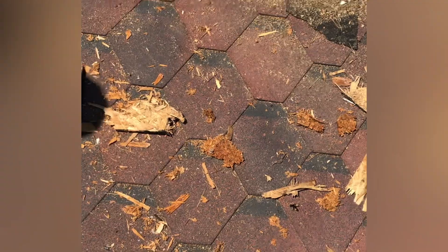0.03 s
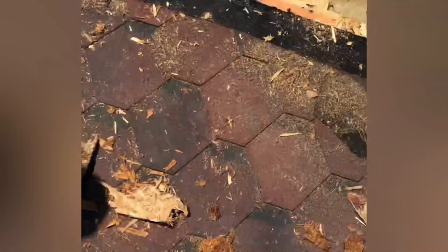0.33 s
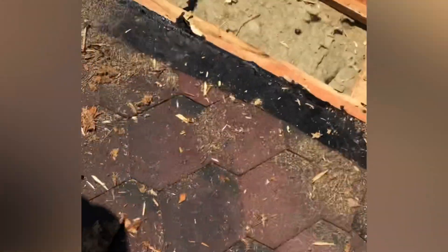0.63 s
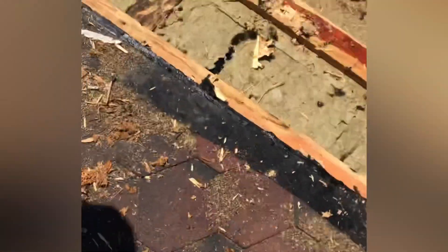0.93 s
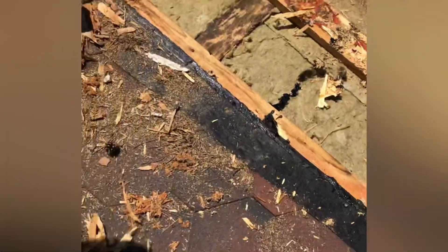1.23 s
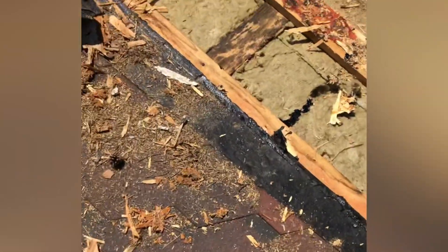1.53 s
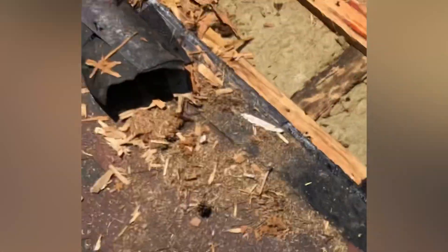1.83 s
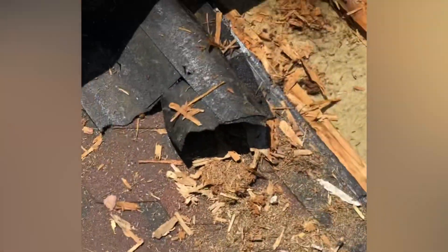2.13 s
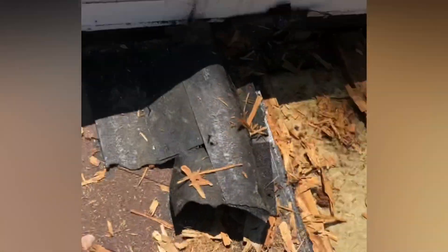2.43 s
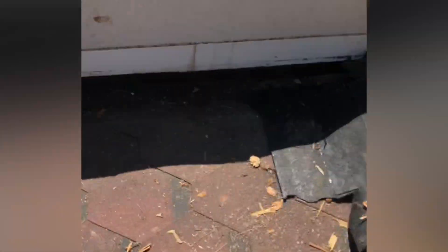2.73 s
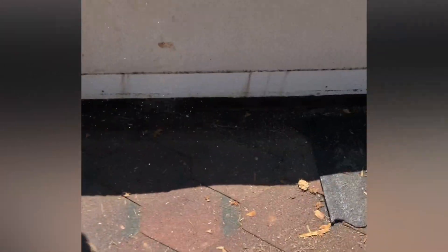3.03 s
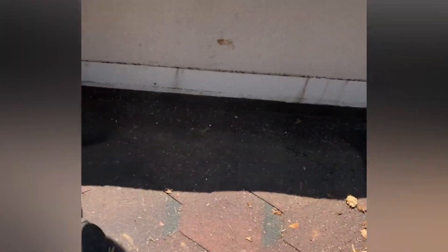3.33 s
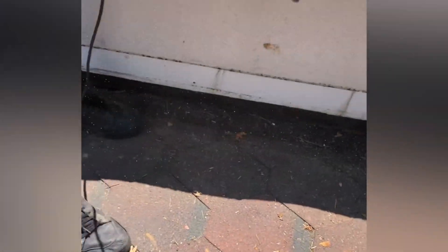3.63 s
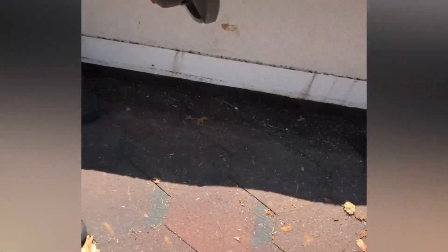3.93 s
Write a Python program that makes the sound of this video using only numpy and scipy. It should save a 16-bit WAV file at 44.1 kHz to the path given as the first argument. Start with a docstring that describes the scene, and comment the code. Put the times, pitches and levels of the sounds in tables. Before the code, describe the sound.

Gritty footsteps and scraping debris, then a power tool spins up with a rising, clattering whine.

```python
"""Boots crunch on gritty shingles close by, at a roof demolition; wood chips tick and rubble is scraped twice.
During the second scrape a geared power tool winds up: slack gears knock and rattle its housing, loose
steel pings, the mesh tone climbs and chatters, cooling air swells and a thin whine rises above it.
Impacts excite damped modes, friction gives dense grains of noise, and the tool's tones follow its rotor.
A wall reflects the work, and a distant engine idles under the outdoor air."""
import sys
import numpy as np
from scipy import signal
from scipy.fft import rfft, irfft, next_fast_len
from scipy.io import wavfile
from scipy.ndimage import uniform_filter1d, map_coordinates

SR = 44100
rng = np.random.default_rng(int(sys.argv[2]) if len(sys.argv) > 2 else 0)


def master_out(mix):
    """Clip the mix to full scale and print it as 16-bit PCM to the path in sys.argv[1]."""
    frames = np.transpose(np.atleast_2d(mix))
    ceiling = np.clip(frames, -1, 1)
    pcm = np.round(ceiling * 32767).astype(np.int16)
    wavfile.write(sys.argv[1], SR, pcm)


N = 176400

# run-up of the rotor (time [s], speed [turns/s])
ROTOR_SPEED = [(2.55, 5), (2.8, 82), (3.2, 244), (3.4, 314), (3.6, 375.5), (3.8, 427.5), (4.0, 469.5)]
# gear impacts: first knocks, later hard clacks (time [s], level [dB])
GEAR_KNOCKS = [(2.5545, -31.5), (2.563, -22.5), (2.577, -23), (2.6215, -23.5), (2.633, -26.5), (2.643, -20),
               (2.663, -20.5), (2.682, -24.5), (2.743, -19)]
GEAR_CLACKS = [(3.407, -7.5), (3.467, -6), (3.494, -5.5), (3.534, -7.5), (3.555, -11), (3.561, -5.5),
               (3.574, -14), (3.596, -7), (3.616, -5.5), (3.622, -8), (3.634, -7), (3.656, -6.5),
               (3.662, -7), (3.677, -4), (3.691, -10), (3.705, -6.5), (3.72, -6), (3.752, -7.5),
               (3.783, -9.5), (3.859, -13), (3.883, -10), (3.955, -9)]
# envelopes of the rattle, mesh tone and whine (time [s], level [dB])
RATTLE_LEVEL = [(2.62, -33), (2.76, -25.5), (2.9, -20.5), (3.05, -24), (3.11, -20.5), (3.15, -24),
                (3.4, -22), (3.6, -25.5), (4, -27)]
MESH_LEVEL = [(2.62, -50), (3.2, -32.5), (3.38, -17.5), (3.45, -28.5), (3.8, -23.5), (4, -21)]
WHINE_LEVEL = [(3.15, -49), (3.33, -31.5), (3.55, -29.5), (3.85, -17.5), (4, -22.5)]
# spectra of the housing and the cooling air (frequency [Hz], level [dB])
HOUSING_SPECTRUM = [(180, -45), (400, -19), (953, -11), (1280, -13), (1440, -5), (1590, -10), (2170, -13),
                    (2400, -20), (2690, 2), (3340, 4), (3920, 0.5), (4150, -5), (5400, -5.5), (6450, -8),
                    (7600, -4), (9140, -5.5), (10300, -13.5), (11900, -10.5), (15500, -28)]
FAN_SPECTRUM = [(100, -11.5), (500, -11), (900, -6.5), (1400, 0.5), (2900, -2), (3800, -3.5), (5200, 4.5),
                (6500, -1), (7800, 5), (9100, -1), (9900, 1.5), (10900, -1.5), (12500, -7), (14500, -6),
                (15500, -20)]
# resonances of the housing (frequency [Hz], level [dB], T60 [s])
HOUSING_MODES = [(980.5, -15, 0.13), (1444, -8, 0.075), (2744, 1, 0.066), (3017, -5.5, 0.14),
                 (3330, 6.5, 0.059), (3896, 7, 0.046), (6130, -14, 0.057), (7650, -6.5, 0.066),
                 (9300, -12, 0.058)]
# strikes on loose steel (time [s], level [dB], brightest frequency [Hz])
STEEL_PINGS = [(2.889, -23, 8800), (2.93, -20.5, 8000), (3.109, -21.5, 7000), (3.184, -15.5, 9200),
               (3.191, -23, 12100), (3.262, -23, 6400)]
# resonances of the steel (frequency [Hz])
STEEL_HZ = [6200, 6870, 7400, 8180, 8680, 10600, 11840, 12350]
# envelopes of the two scrapes (time [s], level [dB])
SCRAPE_1_LEVEL = [(1.15, -41.5), (1.18, -33.5), (1.235, -26.5), (1.265, -21.5), (1.345, -24),
                  (1.366, -25.5), (1.393, -22.5), (1.415, -27), (1.432, -24.5), (1.49, -37.5),
                  (1.65, -43.5), (1.8, -54.5), (2.3, -54)]
SCRAPE_2_LEVEL = [(2.64, -36), (2.71, -23), (2.78, -19.5), (2.86, -18.5), (2.935, -24), (2.98, -30.5),
                  (3.05, -52)]
# rubble spectrum in each scrape (frequency [Hz], level [dB])
SCRAPE_1_SPECTRUM = [(120, -45), (200, -16), (690, -1.5), (957, -5), (1230, -3), (3960, -5), (8350, -15.5),
                     (12500, -19.5), (15500, -28)]
SCRAPE_2_SPECTRUM = [(200, -8.5), (450, -13.5), (750, -7), (1100, 1), (1600, 0.5), (2300, -2.5),
                     (4500, -3.5), (6000, -15), (15000, -24.5)]
# boots on grit (time [s], rise [s], fall [s], level [dB], tilt [dB/octave])
CRUNCHES = [(.04, .0046, 0.44, -48, -3.5), (.145, .079, 0.084, -45, 4), (0.3164, .001, 0.2, -37, 4.5),
            (0.329, 0.0086, 0.15, -35, -2.5), (0.415, 0.0049, 0.11, -40, -1.5),
            (0.517, 0.0082, .05, -37, 0), (0.55, 0.017, 0.11, -31, 0), (.634, .0032, 0.049, -33.5, -1),
            (1.544, 0.033, 0.05, -34, 9), (1.587, .012, 0.024, -32, -.5), (1.636, 0.028, 0.031, -33, -0.5),
            (1.845, 0.083, .03, -45, 10), (1.904, 0.0042, 0.11, -34.5, 2.5),
            (1.941, 0.013, 0.021, -34.5, 3.5), (1.988, 0.0042, 0.032, -35.5, 3.5),
            (2.142, 0.02, 0.066, -41, 0.5), (2.365, 0.054, 0.23, -38, 0.5), (2.493, 0.052, 0.028, -34, 0)]
# dull bumps of the roof deck (time [s], level [dB])
DECK_BUMPS = [(.6, -46), (1.22, -33), (1.3, -41), (1.44, -32.5), (2.2, -49), (2.74, -38.5), (2.85, -35.5),
              (2.95, -38), (3.36, -40), (3.66, -40)]
# spectra of the grit and the deck (frequency [Hz], level [dB])
GRIT_SPECTRUM = [(120, 1), (300, -4), (700, -2), (2500, -4), (4500, -8), (8000, -16), (15500, -28.5)]
DECK_SPECTRUM = [(25, -43), (60, -3), (130, -9.5), (220, -13.5), (400, -16), (1000, -37)]
# a heel strikes, then the weight lands (time [s], level [dB], frequency [Hz], T60 [s])
HEEL_KNOCKS = [(.3155, -26, 610, 0.016), (.3232, -21, 135, 0.048), (.331, -29, 710, 0.046)]
# chips snapping and landing (time [s], level [dB], pitch [Hz], relative click level [dB])
WOOD_CHIPS = [(0.0402, -24.5, 1710, -29), (.187, -33.5, 1100, -22), (.561, -11, 1660, -16),
              (0.772, -30, 1230, -15), (1.0415, -15.5, 1470, -13), (2.0456, -27, 1800, -2),
              (2.071, -29.5, 1640, -20), (2.147, -23, 1520, -19)]
# resonances of a chip (frequency / pitch [ratio], level [dB], T60 [s])
WOOD_MODES = [(1, 2.5, 0.012), (1.29, 1.5, 0.0045), (1.62, -7, 0.0037), (2.1, -5, 0.006)]
# harmonics of the far engine (multiple of the cycle rate [ratio], level [dB])
ENGINE_HARMONICS = [(4, -44.5), (5, -52.5), (6, -53), (7, -66), (8, -55.5), (9, -56)]
# envelope of the far engine (time [s], gain [dB])
ENGINE_GAIN = [(0, -5.5), (.45, -8.5), (.75, -1), (4, -4)]
# spectrum of the outdoor air (frequency [Hz], level [dB])
AIR_SPECTRUM = [(40, -31), (66, -6.5), (218, -10.5), (359, -20), (758, -21.5), (1820, -33), (3650, -30),
                (15500, -52)]

MESH_ORDER, WHINE_ORDER, CLACK_ORDER = 11, 26, 11.32  # cycles per rotor turn
FULL_SPEED_HZ, FAN_DB, FAN_DB_PER_DECADE, SHAFT_DB = 470, -14, 47, -49
CLACK_RISE_S, CLACK_SAG_HZ_PER_S, CLACK_RING_DB = 0.001012, 140000, -22.5
STEEL_T60_S, WALL_T60_S, WALL_DB = 0.079, 0.27, -11.5
IDLE_HZ, AIR_DB = 23.85, -49.5
ONSET_S, TOP_HZ = 0.035, 15750


def power_tool():
    """Rotating machinery: tones are multiples of the shaft rate; air noise is a power law of speed."""
    speed = curve(ROTOR_SPEED, before=0)
    phase = 2 * np.pi * np.cumsum(speed) / SR
    speed_ratio = speed / FULL_SPEED_HZ
    air_db = FAN_DB + FAN_DB_PER_DECADE * np.log10(speed_ratio + 1e-6) + 0.9 * wobble(150)
    air = amp(air_db) * colour(rng.standard_normal(N), FAN_SPECTRUM)
    flutter = 1 + 0.28 * np.cos(phase)  # once a turn
    whine_gain = amp(curve(WHINE_LEVEL, -120) + 2.2 * wobble(90)) * flutter
    whine = whine_gain * np.sin(WHINE_ORDER * phase + 0.38 * wobble(160))
    shaft = amp(SHAFT_DB + 2.2 * wobble(24)) * np.sqrt(speed_ratio) * np.sin(phase)
    gears = gear_knocks() + gear_rattle(speed) + gear_mesh(phase) + gear_clacks(speed)
    return gears + steel_pings() + air + np.sqrt(2) * (whine + shaft)


def gear_knocks():
    """Backlash: the motor's first jolts take up the slack, and each impact rings the housing."""
    out, t = np.zeros(N), np.arange(SR // 5) / SR
    for s, db in GEAR_KNOCKS:
        knock = colour(rng.standard_normal(len(t)), HOUSING_SPECTRUM, tilt_db=-3) * amp(-60 * t / 0.03)
        add(out, s, amp(db) * (knock + amp(-4) * ring(HOUSING_MODES, t)))
    return out


def gear_rattle(speed):
    """Random impact excitation: slack teeth clatter in the housing, more densely with speed."""
    t = np.arange(SR // 8) / SR
    hits = grains(rate=250 + 1.5 * speed, spread_db=2.5, noise=0.35)
    contact_power = signal.fftconvolve(hits ** 2, amp(-120 * t / 0.029))[:N]
    clatter = colour(np.sqrt(np.abs(contact_power)) * rng.standard_normal(N), HOUSING_SPECTRUM)
    ringing = unit(signal.fftconvolve(hits, ring(HOUSING_MODES, t))[:N])
    return amp(curve(RATTLE_LEVEL, -120)) * (clatter + amp(-5) * ringing)


def gear_mesh(phase):
    """Modulation: uneven tooth contacts spread a band of noise around the mesh tone."""
    t = np.arange(SR // 50) / SR
    pulse = t * amp(-60 * t / 0.0029)
    contacts = [grains(rate=320, spread_db=6.5, noise=0.44) for _ in range(2)]
    in_phase, quadrature = [signal.fftconvolve(hits, pulse)[:N] for hits in contacts]
    bursts = unit(in_phase * np.cos(MESH_ORDER * phase) + quadrature * np.sin(MESH_ORDER * phase))
    tone = amp(-7.5 + 4.6 * wobble(60)) * np.sin(MESH_ORDER * phase)
    return amp(curve(MESH_LEVEL, -120)) * (bursts + tone)


def gear_clacks(speed):
    """Impact transients: gears jump and slam back in short falling chirps that ring the housing."""
    out, t = np.zeros(N), np.arange(SR // 12) / SR
    envelope = t / CLACK_RISE_S * np.exp(1 - t / CLACK_RISE_S)
    for s, db in GEAR_CLACKS:
        hz = CLACK_ORDER * speed[round(s * SR)] * (1 + 0.026 * rng.normal())
        cycles = np.cumsum(hz - CLACK_SAG_HZ_PER_S * (t - 2 * CLACK_RISE_S)) / SR
        chirp = envelope * np.sin(2 * np.pi * cycles)
        add(out, s - CLACK_RISE_S, amp(db) * (chirp + amp(CLACK_RING_DB) * ring(HOUSING_MODES, t)))
    return out


def steel_pings():
    """Selective excitation: each strike on loose steel favours the modes near its own pitch."""
    out, t = np.zeros(N), np.arange(SR // 6) / SR
    for s, db, centre_hz in STEEL_PINGS:
        modes = [(hz, -30 * abs(np.log2(hz / centre_hz)), STEEL_T60_S) for hz in STEEL_HZ]
        scuff = colour(rng.standard_normal(len(t)), [(centre_hz, 0), (2 * centre_hz, -30)])
        scuff *= amp(-7 - 60 * t / 0.044)
        add(out, s, amp(db) * (ring(modes, t) + scuff))
    return out


def scrapes():
    """Stick-slip friction: rubble dragged over shingles catches and slips in dense grains."""
    out = np.zeros(N)
    for level, spectrum in [(SCRAPE_1_LEVEL, SCRAPE_1_SPECTRUM), (SCRAPE_2_LEVEL, SCRAPE_2_SPECTRUM)]:
        envelope = amp(curve(level, -120, -120) + 1.82 * wobble(130))
        friction = patchy(grains(rate=5000, spread_db=4, noise=0.5))
        out += envelope * colour(friction, spectrum)
    return out


def boots():
    """Granular crushing: grit crunches underfoot in many tiny impacts, and the deck thuds."""
    grit = grains(rate=2500, spread_db=7, noise=0.31)
    deck = colour(rng.standard_normal(N), DECK_SPECTRUM)
    crunch = sum(swell(s, rise, fall) * amp(db) * colour(grit, GRIT_SPECTRUM, tilt_db)
                 for s, rise, fall, db, tilt_db in CRUNCHES)
    return crunch + deck * sum(amp(db) * swell(s, rise=0.06, fall=0.33) for s, db in DECK_BUMPS)


def heel():
    """Free vibration: a hard footfall leaves the hollow deck ringing in decaying sinusoids."""
    out, t = np.zeros(N), np.arange(SR // 6) / SR
    for s, db, hz, t60 in HEEL_KNOCKS:
        add(out, s, amp(db - 60 * t / t60) * np.sin(2 * np.pi * hz * t))
    return out


def wood_chips():
    """Heavy damping: a dry splinter gives a dull click and rings for only milliseconds."""
    out, t = np.zeros(N), np.arange(SR // 16) / SR
    for s, db, hz, click_db in WOOD_CHIPS:
        wood = sum(amp(level - 60 * t / t60) * np.sin(2 * np.pi * hz * ratio * t)
                   for ratio, level, t60 in WOOD_MODES) / 2
        click = amp(click_db - 60 * t / 0.03) * rng.standard_normal(len(t))
        band = signal.butter(1, [0.85 * hz, 6000], "band", fs=SR, output="sos")
        add(out, s, amp(db) * signal.sosfilt(band, wood + click))
    return out


def wall_reflection(x):
    """Diffuse reflection: the wall beside the roof returns a short tail, 5 ms late."""
    t = np.arange(SR // 3) / SR
    tail = colour(rng.standard_normal(len(t)), [(100, 0.5), (3000, -6), (15000, 0.5)])
    tail *= amp(-60 * t / WALL_T60_S) * (t > 0.005)
    return signal.fftconvolve(x, tail / np.linalg.norm(tail))[:N]


def far_engine():
    """Periodic excitation: an idling engine hums at harmonics of its wavering cycle rate."""
    phase = 2 * np.pi * np.cumsum(IDLE_HZ * (1 + 0.0029 * wobble(4.2))) / SR
    hum = sum(amp(db + 0.96 * wobble(7.9)) * np.cos(order * phase + 2 * np.pi * rng.random())
              for order, db in ENGINE_HARMONICS)
    return np.sqrt(2) * hum * amp(curve(ENGINE_GAIN))


def outdoor_air():
    """Ambient noise: a steady broadband bed, strongest in the bass."""
    return amp(AIR_DB) * colour(rng.standard_normal(N), AIR_SPECTRUM)


def amp(db):
    """Decibels to amplitude ratio."""
    return 10 ** (np.asarray(db) / 20)


def unit(x):
    """Normalisation to rms 1."""
    return x / np.sqrt(np.mean(x ** 2) + 1e-20)


def clock():
    """Time of every sample in seconds."""
    return np.arange(N) / SR


def curve(rows, before=None, after=None):
    """Linear interpolation of (time [s], value) rows."""
    return np.interp(clock(), *np.transpose(rows), left=before, right=after)


def wobble(rate):
    """Smooth random modulation, rate knots a second."""
    return map_coordinates(rng.standard_normal(N // 8), [clock() * rate + 3], mode="wrap")


def colour(x, spectrum, tilt_db=0):
    """Filtering by a (frequency [Hz], level [dB]) response and a tilt per octave, at rms 1."""
    size = next_fast_len(len(x) + 8192)
    octave = np.log2(np.fft.rfftfreq(size, 1 / SR) + 1)
    hz, db = np.transpose(spectrum)
    low_cut = 66 * np.minimum(octave - np.log2(hz[0]), 0)
    tilt = tilt_db * np.maximum(octave - np.log2(hz[1]), 0)
    gain = amp(np.interp(octave, np.log2(hz), db) + tilt + low_cut)
    return unit(irfft(rfft(x, size) * gain, size)[:len(x)])


def grains(rate, spread_db, noise):
    """Shot noise: uneven random impacts, rate a second, on a bed of white noise."""
    weight = np.minimum(rng.exponential(size=N), 2.5)
    size = amp(spread_db * weight) * rng.choice([-1, 1], N)
    impacts = unit(size * (rng.random(N) < rate / SR))
    return unit(impacts + noise * rng.standard_normal(N))


def patchy(x, depth_db=3.5):
    """Spectral fluctuation: narrow bands rise and sink as different pieces sound in turn."""
    bands = signal.stft(x, nperseg=512)[2]
    field = uniform_filter1d(rng.standard_normal(bands.shape), size=4, axis=0)
    field = uniform_filter1d(field, size=5, axis=1)
    return unit(signal.istft(bands * amp(depth_db * unit(field)), nperseg=512)[1][:N])


def swell(s, rise, fall):
    """Exponential envelope peaking at s: up 20 dB over rise, down 60 dB over fall."""
    t = clock() - s
    return amp(np.maximum(np.minimum(20 * t / rise, -60 * t / fall), -150))


def ring(modes, t, scatter_db=2):
    """Modal decay: damped sinusoids, struck a little differently each time."""
    return sum(amp(db + scatter_db * rng.normal() - 60 * t / t60)
               * np.sin(2 * np.pi * hz * t) * rng.choice([-1, 1]) for hz, db, t60 in modes)


def add(track, s, x):
    """Mix x into track at time s."""
    part = track[round(s * SR):][:len(x)]
    part += x[:len(part)]


def scene():
    """Superposition of the work on the roof, its reflection and the background."""
    work = boots() + heel() + wood_chips() + scrapes() + power_tool()
    return (work + amp(WALL_DB) * wall_reflection(work) + far_engine() + outdoor_air())[None]


def record(dry):
    """Gating and band limiting: the sound begins at ONSET_S and holds nothing above TOP_HZ."""
    size = next_fast_len(N + 8192)
    passband = np.fft.rfftfreq(size, 1 / SR) < TOP_HZ
    return irfft(rfft(dry * (clock() > ONSET_S), size) * passband, size)[..., :N]


dry = scene()
out = record(dry)
master_out(out)
```